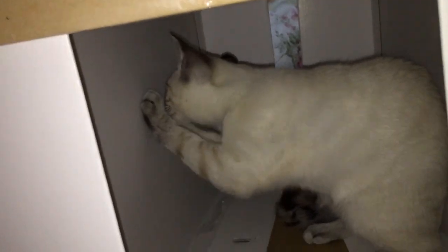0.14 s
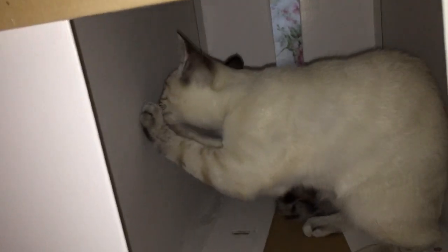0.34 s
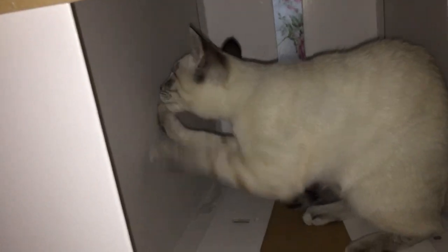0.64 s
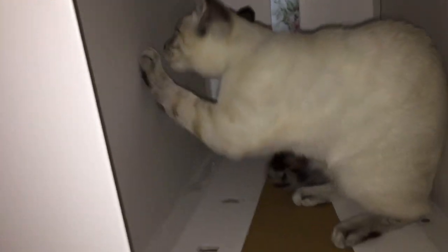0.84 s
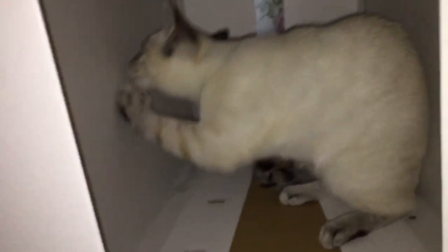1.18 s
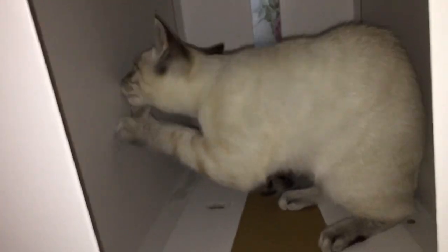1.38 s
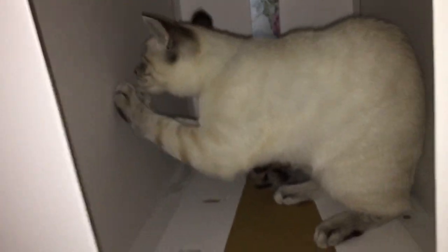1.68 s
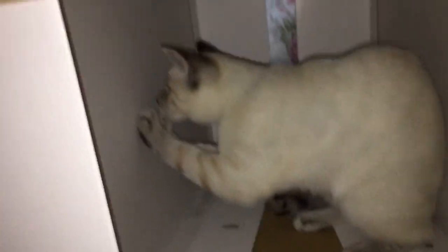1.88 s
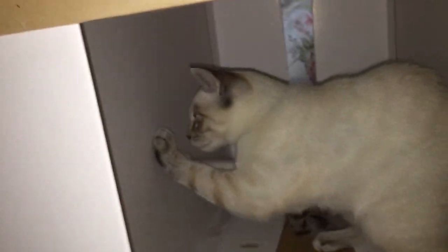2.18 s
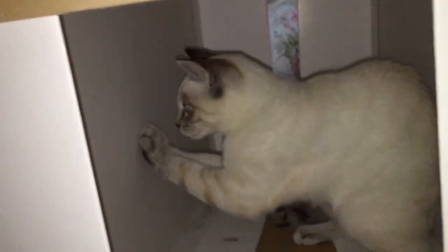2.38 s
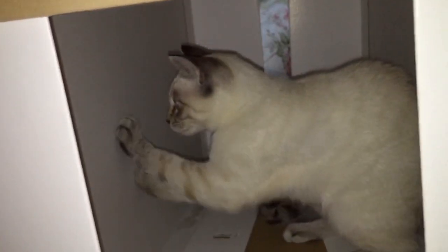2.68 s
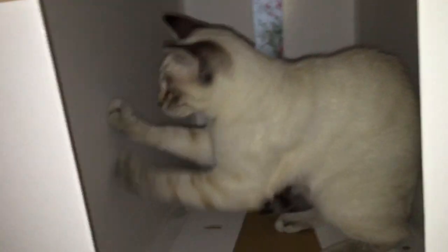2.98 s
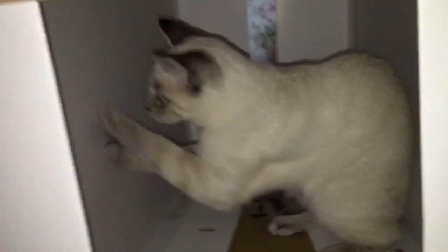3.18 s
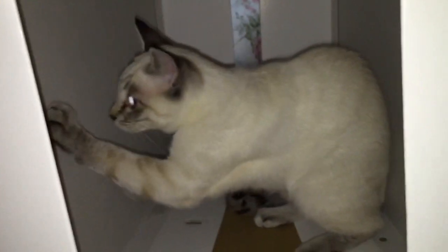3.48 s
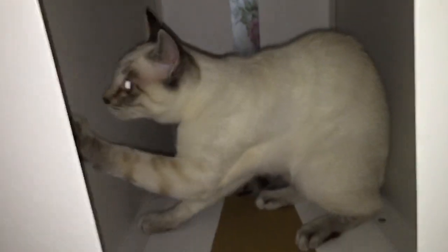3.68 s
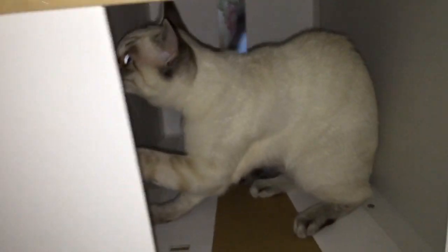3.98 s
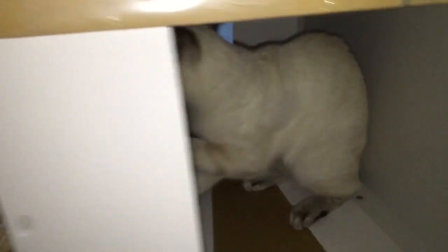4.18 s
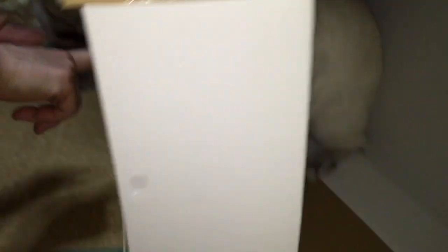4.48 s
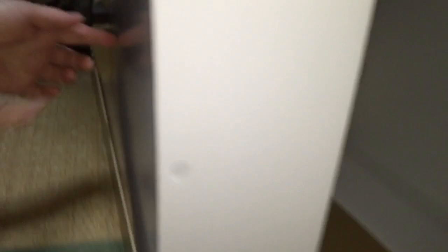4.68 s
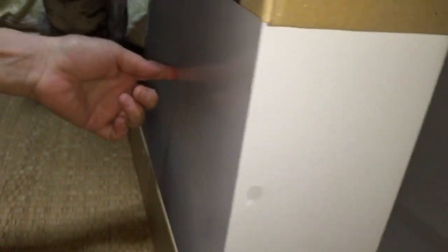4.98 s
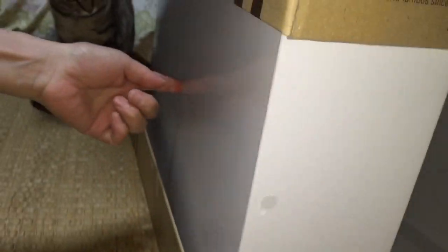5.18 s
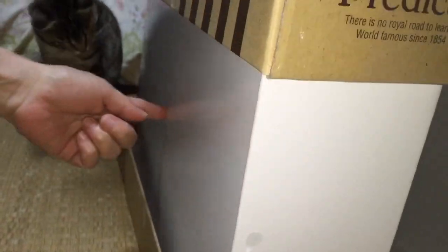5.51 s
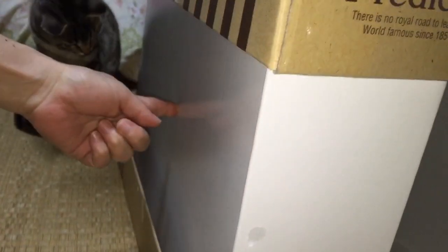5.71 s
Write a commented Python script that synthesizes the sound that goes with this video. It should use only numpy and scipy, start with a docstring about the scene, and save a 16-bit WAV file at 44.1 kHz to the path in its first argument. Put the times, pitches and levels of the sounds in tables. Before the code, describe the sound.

A quiet home with very low, slightly wavering room hum, heard close through a phone in one channel. A cat's paws work at a hollow cardboard box. Faint ticks and touches open the first half second, then a short bright scrape swells and stops near 0.6 s. Softer strokes follow at 1.1 and 1.35 s. From 1.5 to 2.1 s small nail clicks crowd together. Harder, gritty scrapes and sharp ticks come from 2.3 to 3.2 s, strongest near 2.5 and 3.0, with a solid bump at 2.7. Low dull thumps gather from 3.3 to 4.1 s over faint papery friction, with a strong click at 3.63. After a lull, a boxy thump lands at 4.55; a barely audible fingertip rub runs from 4.7. The loudest crisp tick snaps at 5.15, another at 5.3, then soft thumps and a final brief scrape near 5.8 s. The tail is short and dull.

```python
"""A fingertip and a cat's paws rub, scratch and tap a cardboard box, close to a phone in a faintly humming quiet home.
Rubs and scrapes come first, soft then louder; nail ticks crowd from 1.5 to 2.1 s; the hardest scrapes follow to 3.2 s.
Thumps gather from 3.3 to 4.1 s; a long faint rub starts near 4.7 s, the loudest tick falls near 5.15 s,
and late thumps end with one more scrape. Stick-slips and nail bursts ring wall modes; pushes and steps drum panel modes."""
import sys
import numpy as np
from scipy import signal
from scipy.fft import rfft, irfft
from scipy.io import wavfile
from scipy.ndimage import uniform_filter1d

SR = 44100
rng = np.random.default_rng(int(sys.argv[2]) if len(sys.argv) > 2 else 0)


def file_out(sig):
    """Save sig as 16-bit WAV at sys.argv[1]."""
    # one column per channel
    cols = np.atleast_2d(sig).T
    # limit, then scale
    lim = np.clip(cols, -1, 1)
    pcm = np.round(lim * 32767).astype(np.int16)
    wavfile.write(sys.argv[1], SR, pcm)


N = 257976

# room tone spectrum: (frequency [Hz], relative density [dB])
HOME_SPECTRUM = [(18, -53), (30, 2), (111, 0), (173, -12), (359, -9), (505, -18), (921, -15), (1200, -15),
                 (2070, -15.5), (4910, -22), (5740, -21.5), (15500, -29)]
# drum modes of the whole panel: (frequency [Hz], t60 [s], relative level [dB])
PANEL_MODES = [(61.5, 0.19, -0.5), (94.1, 0.12, -3.5), (128, 0.16, -5.5), (191.3, 0.07, -2),
               (249.6, 0.069, 2), (312.7, 0.068, -2), (368, 0.053, -1.5), (619, 0.031, -7)]
# thumps on the panel: (time [s], peak [dB], centre [Hz], spread [octaves], murmur around it [dB])
THUMP_EVENTS = [(.178, -62, 130, 0.3, -58), (.455, -57, 260, 0.37, -79), (.47, -63, 293, 0.6, -75),
                (.587, -45, 72, 0.32, -66), (0.864, -51.5, 135, 0.61, -63.5), (1.035, -56, 352, 0.49, -82),
                (1.099, -55.5, 352, 0.24, -83), (1.747, -46.5, 220, 0.66, -66),
                (2.127, -51.5, 380, 0.37, -70), (2.573, -54.5, 118, 0.27, -70),
                (2.714, -32, 263, 0.97, -67), (2.853, -51, 105, 0.19, -66), (3.006, -55, 59.7, 0.25, -57.5),
                (3.158, -54, 417, 0.14, -71.5), (3.302, -36.5, 86.5, 0.35, -52.5),
                (3.398, -54.5, 109, 0.84, -63.5), (3.618, -43.5, 134, 0.65, -49.5),
                (3.696, -40, 112, 0.75, -46), (3.742, -41, 132, 0.68, -62), (3.829, -42.5, 79, .4, -55.5),
                (3.943, -47, 78, 0.22, -52.5), (4.02, -68, 150, 0.39, -54.5), (4.12, -41.5, 82, 0.29, -62),
                (4.484, -58, 547, .4, -79), (4.537, -50, 256, 0.12, -72), (4.555, -34, 210, .46, -56.5),
                (4.59, -48.5, 200, 0.39, -69), (4.741, -41, 236, 0.25, -59.5),
                (5.149, -32.5, 242, 0.19, -63), (5.318, -43.5, 288, 0.14, -67),
                (5.501, -49, 240, 0.29, -67), (5.529, -41.5, 222, 0.34, -56),
                (5.551, -43.5, 238, 0.39, -69), (5.601, -52, 238, 0.35, -85), (5.66, -53, 227, 0.26, -57.5),
                (5.759, -50.5, 240, 0.33, -60.5)]
# wall modes under a scratch: (frequency [Hz], base width [Hz], relative level [dB])
WALL_MODES = [(514, 204, -21.5), (741, 82, -12.5), (1012, 260, -11), (1201, 102, -5), (1399, 155, -5.5),
              (1680, 140, -0.5), (1916, 111, 2.5), (2077, 96, 2), (2258, 132, -1), (2454, 103, -1),
              (2742, 200, -0.5), (3070, 89, 1.5), (3337, 125, -1.5), (3710, 460, -6), (4144, 220, -6),
              (4590, 260, -9), (4914, 440, -16.5), (5360, 260, -11.5), (5820, 170, -13), (6320, 550, -16),
              (6880, 1970, -18.5), (9070, 1220, -22), (11440, 670, -32.5), (12900, 4800, -26.5)]
# nail ticks: (time [s], peak [dB], centre [Hz], spread [octaves], contact [s], t60 [s])
TICK_EVENTS = [(0.197, -46.5, 1550, 0.8, 0.015, 0.064), (0.221, -44.5, 1680, 0.91, 0.0018, 0.028),
               (0.514, -37, 1500, 0.64, 0.0016, 0.037), (0.78, -55, 1520, 1.1, 0.002, 0.022),
               (0.829, -42.5, 1380, 0.2, 0.0026, 0.046), (0.853, -46.5, 1260, 0.3, 0.001, 0.028),
               (1.033, -44.5, 1450, 0.77, 0.0044, 0.037), (1.097, -46, 1300, .5, 0.0036, 0.05),
               (1.495, -54, 870.0, 0.57, 0.001, 0.099), (1.707, -50, 1080, 0.34, 0.018, 0.057),
               (1.716, -44.5, 1600, 0.28, 0.0023, 0.018), (1.737, -45.5, 880, 0.18, 0.0029, 0.031),
               (1.751, -35, 1170, 0.26, 0.0014, 0.056), (1.766, -58, 2620.0, 2, 0.0013, 0.012),
               (1.784, -52, 6060, 1.6, 0.00091, 0.015), (2.007, -41.0, 2500, 0.41, 0.0012, 0.039),
               (2.047, -42.5, 2400, 0.18, 0.0014, 0.053), (2.064, -42, 1570, 0.58, 0.0043, 0.13),
               (2.106, -39.5, 1840, 0.49, 0.001, 0.22), (2.129, -40, 1540, 0.74, 0.0083, 0.042),
               (2.135, -41, 2340, 0.18, 0.0023, 0.032), (2.22, -57.5, 1990, 0.62, 0.0029, 0.04),
               (2.3, -43, 1680, 0.63, 0.0028, 0.07), (2.346, -31, 1730, 0.5, 0.0098, 0.051),
               (2.412, -45, 2280, 0.68, 0.017, 0.054), (2.533, -27.5, 2200, 0.25, 0.0031, 0.018),
               (2.722, -33, 2820, 0.21, 0.0043, 0.025), (2.763, -42.5, 1800, 0.66, 0.0019, 0.038),
               (2.83, -55.5, 1600, 0.62, 0.003, 0.36), (2.856, -35.5, 1600, 0.4, 0.0026, 0.05),
               (3.05, -30.5, 2430, 0.56, 0.014, 0.028), (3.16, -41, 720, 0.6, 0.0011, 0.022),
               (3.588, -46.5, 1520, 0.53, 0.0021, 0.057), (3.628, -27, 1000, 0.16, 0.002, 0.019),
               (3.663, -44.5, 2720.0, 0.68, 0.0009, 0.019), (3.878, -37, 1580, 0.45, 0.0011, 0.012),
               (4.383, -58, 980.0, 0.71, 0.0015, 0.022), (4.425, -56.5, 9200, 1.05, 0.0057, 0.047),
               (4.431, -56, 1530.0, 0.98, 0.0012, 0.042), (4.52, -52, 13390.0, 0.19, 0.0014, 0.023),
               (4.536, -49, 1730.0, 0.97, 0.0013, 0.039), (4.554, -44, 2450, 0.41, 0.013, 0.027),
               (5.147, -22, 1930, 0.49, 0.001, 0.023), (5.222, -54, 2220, 0.94, 0.0015, 0.025),
               (5.285, -49.5, 2770, 0.29, 0.00092, 0.033), (5.317, -33.5, 1540, 0.57, 0.0016, 0.052),
               (5.492, -50, 1120, 0.89, 0.0047, 0.059)]
# strokes along the wall: (touch [s], swell [s], hold [s], fade [s], top level [dB], sag over the hold [dB],
# shares at the top: soft pad's low modes [dB], nail's sharp modes [dB], loose fibre hiss [dB])
STROKE_EVENTS = [ (0.0, 0.00091, 0.018, 0.15, -60.5, 8, -1, 3, -14),
                 (0.198, 0.053, 0.16, 0.034, -63, 2.5, -3, 6.5, -7.5),
                 (0.482, 0.009, 0.02, .01, -70, 1, 4.5, -4, -16),
                 (0.528, 0.098, 0.031, 0.011, -36.5, 6, -13.5, 5, -11.5),
                 (0.656, .003, 0.027, 0.021, -71.5, -3, -18, 7.5, -5),
                 (0.859, .002, 0.079, .03, -71.5, 2.5, 2, -2.5, -9),
                 (1.025, 0.1, 0.12, 0.083, -49.5, 1, -5.5, 1, -11.5),
                 (1.241, 0.095, 0.083, 0.037, -40.5, 12, -9, 2.5, -18.5),
                 (2.131, 0.0056, 0.009, 0.038, -50, 10.5, 5.5, 1.5, -20),
                 (2.364, .004, 0.028, 0.027, -61, 8, 8, -2, -26),
                 (2.392, 0.052, .12, 0.023, -41, 3, -14.5, -1.5, -20),
                 (2.572, .005, .15, 0.068, -62.5, -7, -6, -2, -9.5),
                 (2.704, 0.021, .03, 0.027, -53.5, 18, -1, -2, -15),
                 (2.87, .002, .05, .03, -70, 3, -2, 2, -24),
                 (2.912, .1, 0.024, 0.015, -33.5, 5.5, -22, 0, -20.5),
                 (3.057, 0.003, 0.11, 0.044, -62, -7, -6, -7.5, -8.5),
                 (3.127, 0.12, 0.057, 0.033, -43.5, 27, -18, -2.5, -13.5),
                 (3.268, 0.015, 0.37, .02, -63, 13, -2.5, 1.5, -0.5),
                 (3.564, 0.07, 0.325, 0.1, -60.5, 1, 0, 0.5, -1),
                 (3.933, 0.06, 0.057, 0.14, -48.5, 7, -3, -5, -4.5),
                 (4.012, 0.042, 0.15, 0.15, -57, 8, -7, 5, 1),
                 (4.549, 0.0043, 0.021, 0.027, -60.5, 2.5, 5, 4.5, -23),
                 (4.685, 0.044, 0.81, .03, -68.5, 25.5, 0.5, 5, 0),
                 (5.156, 0.0037, 0.016, 0.081, -48, 13, -8, -3, -17),
                 (5.479, 0.016, 0.05, 0.039, -72, -3, 11, -2.5, -26),
                 (5.65, 0.021, 0.032, .03, -63.5, 0, 2, 4, -11),
                 (5.688, 0.099, 0.036, 0.023, -43.5, 6.5, -10, 5.5, -8), ]
# gain per dB of pressure until the top: (pad [dB/dB], middle [dB/dB], nail [dB/dB], fibre [dB/dB])
SWELL_FOLLOWS_DB_PER_DB = [0.55, 1, 0.93, 0.87]
# the same after the top, where a slowing stroke dulls: (pad, middle, nail, fibre [dB/dB])
FADE_FOLLOWS_DB_PER_DB = [.8, 1, 1.2, 1.3]

HOME_DB = -70
REST_DB, REST_DRUM_DB = -68, -11  # panel sway between thumps; its drum modes relative to that
MURMUR_LATE_S, MURMUR_RISE_DB_PER_S, MURMUR_FALL_DB_PER_S = 0.014, 272, 203
DRUM_DB, DRUM_DB_PER_OCTAVE = -4, 5  # drum share of a murmur at 125 Hz; more for higher thumps
PUSH_S = 0.0057
SLIPS_PER_S, SLIP_SPREAD_DB, JUDDER_DB = 9000, 1, 0.18
SWELL_DB, FADE_DB = 27.5, 23.5  # pressure: first touch to top; end of hold to letting go
EDGE_S = 0.008  # contact made or broken
ROOM_T60_S, ROOM_DB = 0.18, -21
TOP_HZ = 15800


def undb(db):
    """dB to gain."""
    return 10 ** (np.asarray(db) / 20)


def unit(x):
    """Scale to rms 1."""
    return x / np.sqrt(np.mean(x ** 2))


def decay(t_s, t60_s):
    """Exponential decay, 60 dB down after t60."""
    return 1000. ** (-t_s / t60_s)


def ring(x, hz, width_hz):
    """One resonance, gain 1 at its centre."""
    return signal.lfilter(*signal.iirpeak(hz, hz / width_hz, SR), x)


def walk(rate_hz):
    """Random levels held 1 / rate_hz and slewed twice; rms 1."""
    hold = int(SR / rate_hz)
    steps = np.repeat(rng.standard_normal(N // hold + 1), hold)
    slewed = uniform_filter1d(uniform_filter1d(steps, hold), hold)
    return unit(slewed[:N])


def add(out, time_s, x):
    """Mix x in from time_s."""
    i = int(time_s * SR)
    out[i:i + len(x)] += x[:N - i]


def add_peak(out, time_s, peak_db, x):
    """Mix x in at a set peak level."""
    add(out, time_s, undb(peak_db) * x / np.abs(x).max())


def home():
    """Room tone: noise shaped to a fixed spectrum, its level wavering slowly."""
    hz, db = np.transpose(HOME_SPECTRUM)
    f = np.arange(N // 2 + 1) * SR / N + 1
    shape = undb(np.interp(np.log(f), np.log(hz), db))
    tone = irfft(rfft(rng.standard_normal(N)) * shape, N)
    waver_db = 1.0 * walk(3)
    return undb(HOME_DB + waver_db) * unit(tone)


def flexing():
    """Uneven pressure keeps the panel's modes murmuring, most around each thump."""
    t = np.arange(N) / SR
    sway_power, drum_power = undb(2 * REST_DB), undb(2 * (REST_DB + REST_DRUM_DB))
    for time_s, _, centre_hz, _, murmur_db in THUMP_EVENTS:
        since_s = t - time_s - MURMUR_LATE_S
        db = murmur_db + np.minimum(MURMUR_RISE_DB_PER_S * since_s, -MURMUR_FALL_DB_PER_S * since_s)
        drum_db = db + DRUM_DB + DRUM_DB_PER_OCTAVE * np.log2(centre_hz / 125)
        sway_power = sway_power + undb(2 * db)
        drum_power = drum_power + undb(2 * drum_db)
    groups = [0, 0]  # sway modes, drum modes
    for hz, t60_s, gain_db in PANEL_MODES:
        force = undb(3.5 * walk(21.985)) * rng.standard_normal(N)
        mode = ring(ring(force, hz, 2.2 / t60_s), hz, hz / 1.5)
        groups[int(hz > 160)] += undb(gain_db) * mode
    return np.sqrt(sway_power) * unit(groups[0]) + np.sqrt(drum_power) * unit(groups[1])


def thumps():
    """A rounded push drums the panel, mostly the modes near its pitch."""
    out, t = np.zeros(N), np.arange(11025) / SR
    swell = 1 - np.exp(-t / max(PUSH_S, .001))
    for time_s, peak_db, centre_hz, octaves, _ in THUMP_EVENTS:
        modes = 0
        for hz, t60_s, gain_db in PANEL_MODES:
            off = np.log2(hz / centre_hz) / max(octaves, .15)
            gain = undb(gain_db - 3.17 * off ** 2)
            modes = modes + gain * np.sin(2 * np.pi * hz * t) * decay(t, t60_s)
        add_peak(out, time_s, peak_db, swell * modes)
    return out


def ticks():
    """A nail clicks, chatters while in contact, then dies away; wall modes near its pitch answer most."""
    out, t = np.zeros(N), np.arange(4410) / SR
    # columns, to broadcast over time
    times_s, peaks_db, centre_hz, octaves, contact_s, t60_s = np.transpose(TICK_EVENTS)[:, :, None]
    chatter = rng.standard_normal((len(TICK_EVENTS), len(t)))
    burst = chatter * decay(np.maximum(t - contact_s, 0), np.maximum(t60_s, .004))
    burst *= np.minimum(t / .002, 1)
    burst[:, 20] += 5.0  # click
    sounds = 0
    for hz, width_hz, _ in WALL_MODES:
        off = np.log2(hz / centre_hz) / np.maximum(octaves, .2)
        gain = undb(np.maximum(-4.5 * off ** 2, -29.0))
        mode = ring(ring(burst, hz, 1.91 * width_hz), hz, 4.213 * width_hz)
        sounds = sounds + gain * mode / np.sqrt(width_hz)
    for time_s, peak_db, sound in zip(times_s[:, 0], peaks_db[:, 0], sounds):
        add_peak(out, time_s, peak_db, sound)
    return out


def slips():
    """Fibres catching and letting go: dense clicks of very uneven size."""
    chance, sign, size = rng.random(N), rng.standard_normal(N), rng.exponential(size=N)
    return (chance < SLIPS_PER_S / SR) * sign * undb(SLIP_SPREAD_DB * size)


def stroke_power():
    """Pressure swells, holds and fades; pad, middle, nail, upper and fibre modes follow it differently."""
    power = np.zeros((5, N))
    for touch_s, swell_s, hold_s, fade_s, top_db, sag_db, pad_db, nail_db, fibre_db in STROKE_EVENTS:
        bends_s = touch_s + np.cumsum([0, max(swell_s, .001), max(hold_s, .001), max(fade_s, .001)])
        first = max(int((touch_s - EDGE_S) * SR), 0)
        last = min(int((bends_s[-1] + EDGE_S) * SR), N)
        i = np.arange(first, last)
        t = i / SR
        pressure_db = np.interp(t, bends_s, [-SWELL_DB, 0, -sag_db, -sag_db - FADE_DB])
        inside_s = np.minimum(t - touch_s, bends_s[-1] - t)
        contact = np.clip(inside_s / EDGE_S + 1, 0, 1)
        follows = np.where(t < bends_s[1], np.c_[SWELL_FOLLOWS_DB_PER_DB], np.c_[FADE_FOLLOWS_DB_PER_DB])
        pad, middle, nail, fibre = np.c_[[pad_db, 0, nail_db, fibre_db]] + follows * pressure_db
        upper = (nail + fibre) / 2 - 2.5  # fed by both nail and fibres
        group_db = top_db + np.array([pad, middle, nail, upper, fibre])
        power[:, i] += (contact * undb(group_db)) ** 2
    return power


def rubbing():
    """Slips ring the wall; pad, nail and loose fibres each feed their own range of modes."""
    power = stroke_power()
    judder = undb(JUDDER_DB * walk(90))  # grip tightens and loosens over the flutes
    groups, forces = np.zeros((5, N)), [judder * slips() for _ in range(6)]
    for k, (hz, width_hz, db) in enumerate(WALL_MODES):
        # neighbours are fed from different spots: colour shimmers as the contact moves
        shimmer_db = 3.26 * min(250 / width_hz, 1) ** 0.44 * walk(22.004)
        mode = ring(ring(forces[k % 6], hz, width_hz), hz, 2.5 * width_hz)
        group = np.searchsorted([1500, 2450, 4900, 8000], hz)
        groups[group] += undb(db + shimmer_db) * mode
    return sum(np.sqrt(p) * unit(group) for p, group in zip(power, groups))


def tail(box):
    """Short dull tail of hollow and room: the box convolved with decaying low-passed noise."""
    t = np.arange(22050) / SR
    dull = signal.lfilter([1], [1, -.7], rng.standard_normal(len(t)))
    response = dull * decay(t, ROOM_T60_S) * (t > .003)
    return signal.fftconvolve(box, response / np.sqrt(np.sum(response ** 2)))[:N]


def scene():
    """The box close by, its tail and the room tone, in one channel."""
    box = flexing() + thumps() + ticks() + rubbing()
    return (home() + box + undb(ROOM_DB) * tail(box))[None]


def record(dry):
    """The phone drops the deepest bass and cuts the top."""
    thin = signal.sosfilt(signal.butter(2, 38, "high", fs=SR, output="sos"), dry)
    return signal.sosfilt(signal.ellip(12, .2, 80, TOP_HZ, fs=SR, output="sos"), thin)


dry = scene()
out = record(dry)
file_out(out)
```